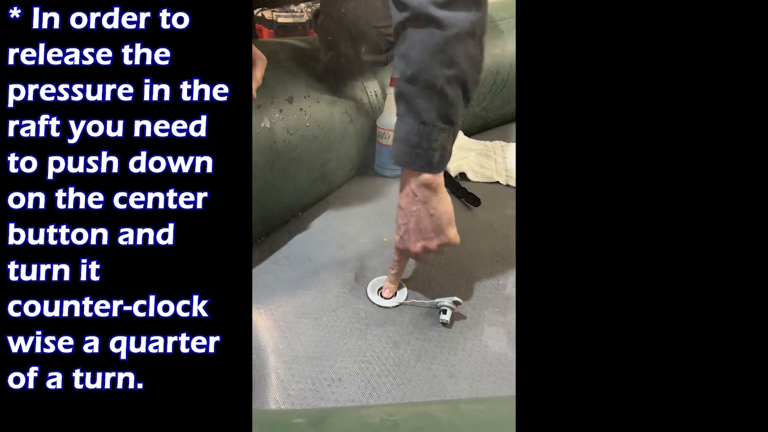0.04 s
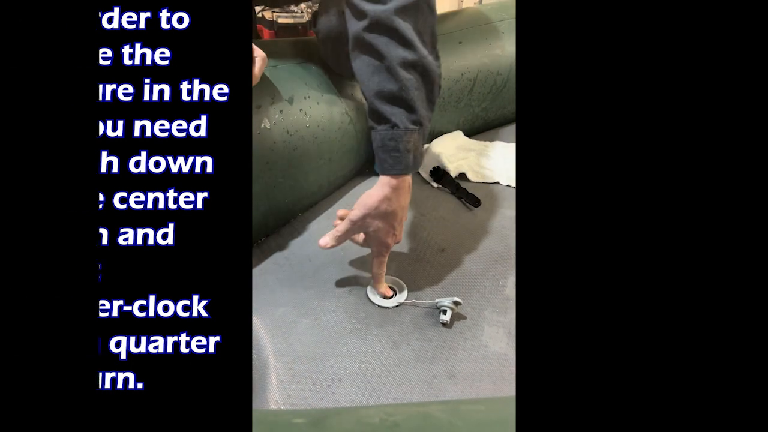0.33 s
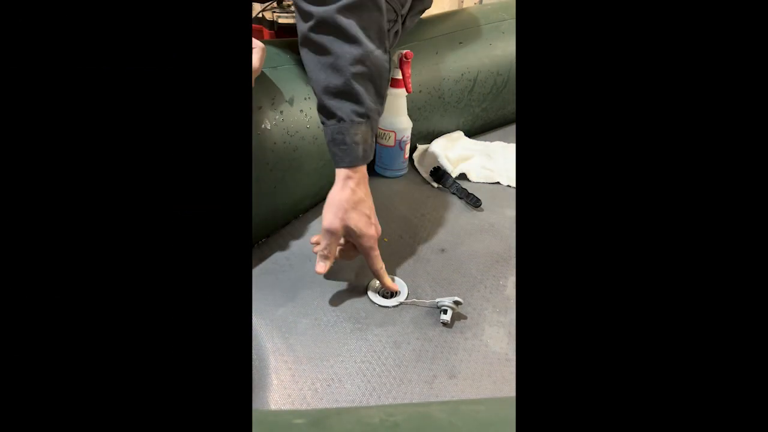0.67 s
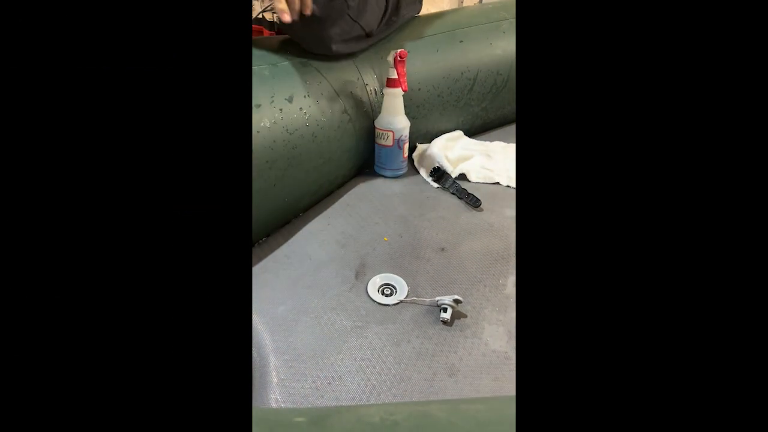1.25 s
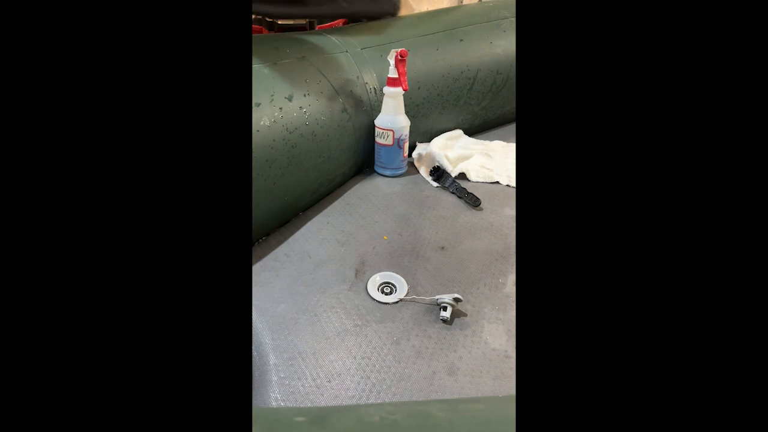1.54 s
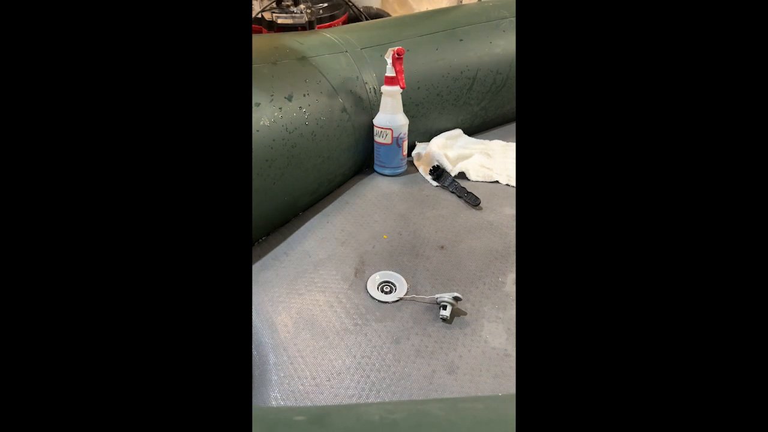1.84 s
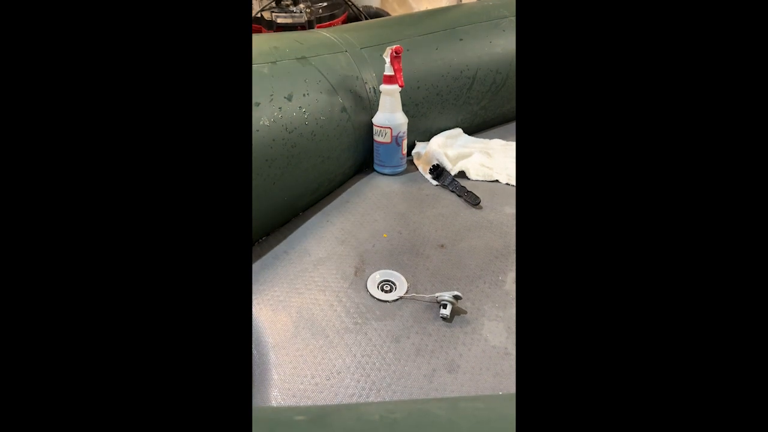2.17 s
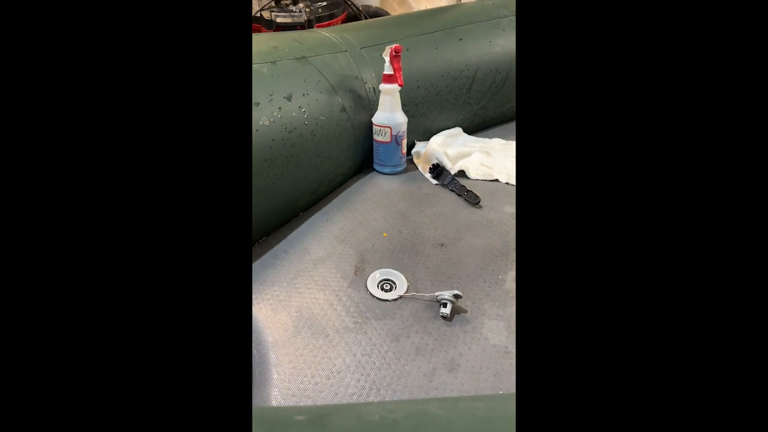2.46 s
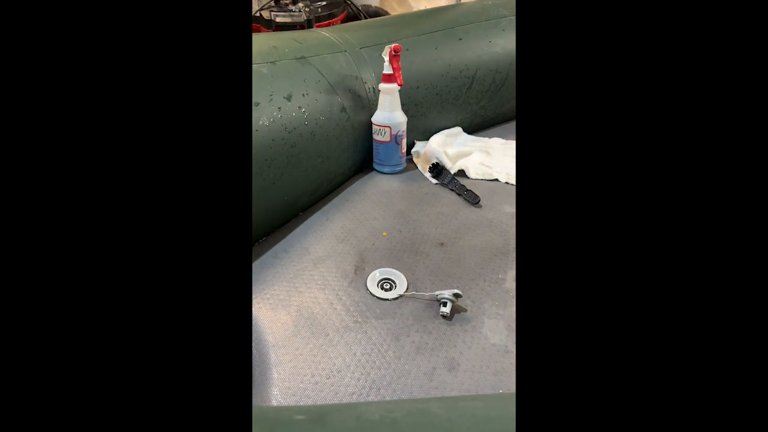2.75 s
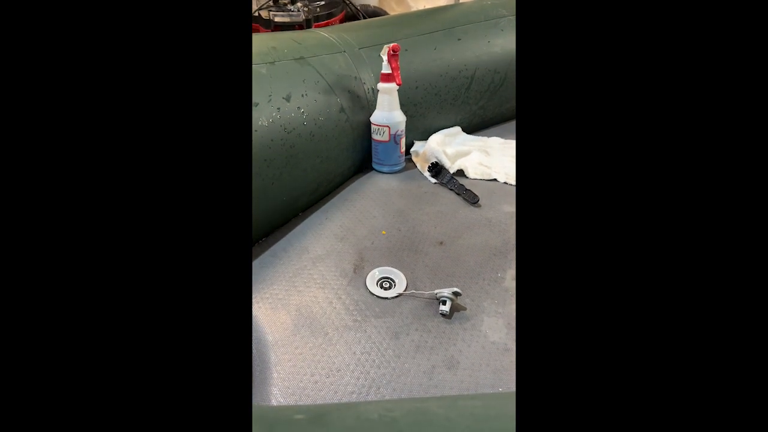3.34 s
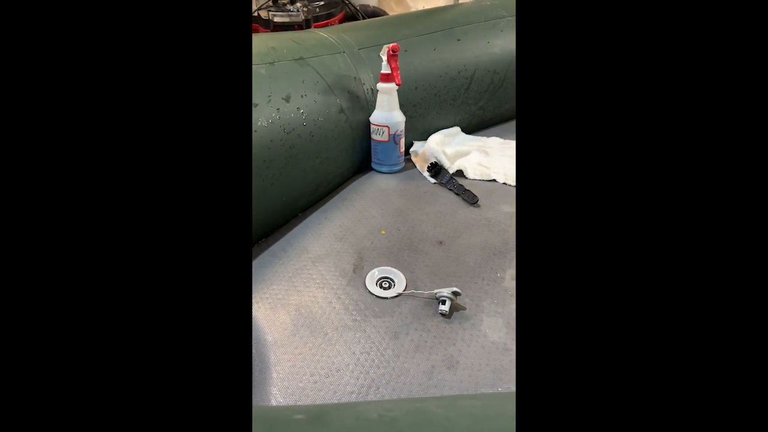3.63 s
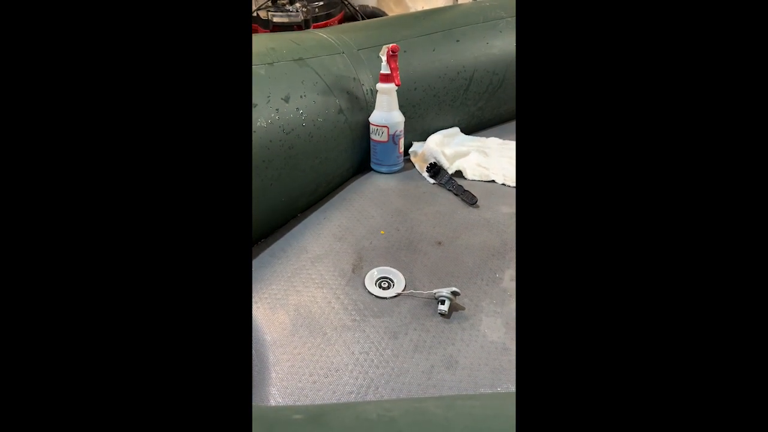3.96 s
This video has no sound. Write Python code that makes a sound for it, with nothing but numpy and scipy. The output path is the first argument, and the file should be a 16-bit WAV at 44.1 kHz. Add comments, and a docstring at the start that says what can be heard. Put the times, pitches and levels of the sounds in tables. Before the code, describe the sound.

A close jet of air rushes from the valve of a deflating raft. It wavers and buffets around a fingertip, then flows smoothly with a faint fuzzy whistle and dies down to a soft low rush.

```python
"""A jet of air rushes out of the valve of an inflatable raft, close by.
At first a finger turning the valve button deflects the jet into brief whistly hisses and a low buffeting.
Then the jet blows freely, with a fuzzy whistle at the valve seat, and weakens as the pressure falls:
the treble dies first, the low rush last. Each source is a map of loudness over pitch and time;
together the maps shape one stereo noise, which echoes faintly off the raft and the room."""
import sys
import numpy as np
from scipy import signal
from scipy.io import wavfile
from scipy.ndimage import uniform_filter1d

SR = 44100
rng = np.random.default_rng(int(sys.argv[2]) if len(sys.argv) > 2 else 0)


def dump_mix(stems):
    """Bounce the given channels to the path in sys.argv[1] as a 16-bit WAV at rate SR."""
    frames = np.atleast_2d(stems).T  # one column per channel
    limited = np.clip(frames, -1, 1)  # hard clip at full scale
    pcm = np.round(limited * 32767).astype(np.int16)
    wavfile.write(sys.argv[1], SR, pcm)


N = 176400
FRAME, HOP = 1024, 256  # samples in one slice of sound, and from one slice to the next
FINGER_OFF_S, HAND_EDGE_S = 0.97, 0.01  # when the finger leaves, and how fast the hand acts

# Strength of the jet as the raft empties: t/s, level/dB
FLOW = [(0, 1), (.45, 0.6), (.8, 1.4), (1, 1), (1.2, 0), (1.5, -1.1), (2, -4.5), (2.35, -6.5), (2.55, -8.5),
        (2.8, -9.5), (3.15, -14), (3.5, -16.5), (4, -22)]


def amp(db):
    """Turns decibels into a gain."""
    return 10 ** (np.asarray(db) / 20)


def unit_rms(x):
    """Scales a signal or a spectrum to an average power of one."""
    return x / np.sqrt(np.mean(x ** 2) + 1e-20)


def grid():
    """The axes of a map: times as a row, frequencies as a column."""
    return np.arange(N // HOP + 2)[None] * HOP / SR, np.fft.rfftfreq(FRAME, 1 / SR)[:, None]


def look_up(table, hz):
    """Reads a table's columns at any frequency, blending between rows on a log scale."""
    row_hz, *columns = np.transpose(table)
    return [np.interp(np.log(hz + 1), np.log(row_hz + 1), column) for column in columns]


def gate(t, start, end, edge):
    """One between start and end, zero outside, with soft edges."""
    return (np.tanh(2 * (t - start) / edge) - np.tanh(2 * (t - end) / edge)) / 2


def reflections(sound):
    """Weak echoes from the raft's tubes and the room give the tone a fine, steady ripple."""
    echo_db, fade_60db_s = -17.5, 0.15
    t = np.arange(SR // 8) / SR
    echoes = rng.standard_normal(t.size) * (rng.random(t.size) < .03)
    echoes *= amp(-60 * t / fade_60db_s) * (t > .003)
    response = amp(echo_db) * echoes / np.linalg.norm(echoes) + (t == 0)  # echoes plus direct sound
    return signal.fftconvolve(sound, response[None] / np.linalg.norm(response), axes=1)[:, :N]


def air_noise(gain_map):
    """Noise shaped by a map, slightly different left and right."""
    # Stereo image by pitch: f/Hz, left minus right/dB, likeness/0-1, left lead/rad
    stereo_image = [(150, 2, .99, -.03), (450, 2.6, .985, -.1), (680, 4.6, .97, -.36), (870, .7, .95, -.37),
                    (1100, 1.7, .97, -.18), (1310, 0, 1, 0), (2250, 0, 1, 0), (2600, -.8, .95, .45),
                    (2900, 0, .88, .5), (3170, 0, .35, 1.2), (3320, 8, .6, .05), (3720, 3.2, .95, -.1),
                    (3950, 4.3, .8, -.2), (4080, 2, .6, -.35), (4300, 0, 1, 0), (4600, .3, .98, 0),
                    (4850, 3, .84, -.35), (5200, 0, .84, -.85), (5800, .7, .88, -1.24),
                    (7000, .2, .89, -1.3), (9700, 0, .64, -1.3), (11500, 0, .82, -1.36),
                    (12700, 0, .62, -1.43), (14300, 0, .79, -1.56), (15700, 0, .62, -1.7)]
    t, hz = grid()
    white = rng.standard_normal((2, (t.size - 1) * HOP))
    left, unrelated = signal.stft(white, nperseg=FRAME, noverlap=FRAME - HOP)[2]
    balance_db, likeness, lead = look_up(stereo_image, hz)
    likeness = np.clip(likeness, 0, 1)
    right_gain = amp(-balance_db)
    blend = likeness * left + np.sqrt(1 - likeness ** 2) * unrelated
    right = blend * np.exp(-1j * lead) * right_gain
    pair = np.array([left, right]) * gain_map / np.sqrt((1 + right_gain ** 2) / 2)
    return signal.istft(pair, nperseg=FRAME, noverlap=FRAME - HOP)[1][:, :N]


def seat_whistle():
    """The valve seat whistles once the finger is off, fading quickly as the flow drops."""
    centre_hz, width_hz = 6120, 330
    t, hz = grid()
    flow_db = np.minimum(np.interp(t, *np.transpose(FLOW)), 0)
    ring = unit_rms(1 / (1 + (2 * (hz - centre_hz) / width_hz) ** 2))
    opened = (1 + np.tanh((t - FINGER_OFF_S) / HAND_EDGE_S)) / 2
    return amp(-24.5 + 2.8 * flow_db) * ring * opened


def finger_gap():
    """Deflected air rings in the gap at the fingertip, coming and going as the finger shifts."""
    # Short hisses and low buffets: start/s, end/s, centre/Hz, width/Hz, level/dB
    deflections = [(-.05, .33, 3950, 700, -25), (-.05, .45, 7500, 1400, -23.5),
                   (-.05, .46, 11900, 1700, -32), (-.05, 0.479, 2280, 1800, -25),
                   (-.05, .8, 4450, 1300, -28), (.085, 0.17, 2780, 600, -20.5), (.235, 0.3, 2880, 650, -21),
                   (.21, .44, 262, 109, -29), (.31, 0.4, 383, 130, -26.5), (.445, .515, 6400, 1530, -17.5),
                   (.5, 0.66, 2340, 1540, -19.5), (.52, 0.595, 6480, 2200, -17),
                   (.51, 0.55, 9600, 900, -33), (.637, .715, 5580, 900, -15),
                   (.655, 0.71, 6300, 1300, -15.5), (.712, 0.75, 2680, 497, -17.5),
                   (.712, 0.81, 1790, 1530, -19)]
    t, hz = grid()
    power = 0
    for start, end, centre, width, db in deflections:
        ring = unit_rms(1 / (1 + (2 * (hz - centre) / width) ** 4))
        power += (amp(db) * ring * gate(t, start, end, edge=0.0056)) ** 2
    return np.sqrt(power)


def turbulence(bands, slices):
    """Swirling air: a random map, smoothed over so many frequency bands and time slices."""
    t, hz = grid()
    swirl = rng.standard_normal((hz.size, t.size))
    for axis, span in [(0, bands), (1, slices)] * 2:
        swirl = uniform_filter1d(swirl, span, axis, mode="wrap")
    return unit_rms(swirl)


def air_jet():
    """The turbulent jet hisses, dulls as the flow drops, and is less steady with the finger in it."""
    # Tone of the jet, with the resonances of the valve body: f/Hz, level/dB
    colour = [(45, -20), (100, -18.5), (150, -10), (200, -2.5), (260, -2.1), (340, -4), (520, -2.5),
              (720, 1.3), (860, -5), (1130, -1), (1400, -4.5), (1600, -3.5), (1800, -1.5), (2080, -5.5),
              (2380, -1), (2560, 2.4), (2760, -0.4), (2950, -4), (3170, -8.5), (3380, -3), (3650, 0.6),
              (3880, -2), (4100, -13), (4300, -4.5), (4500, -4), (4800, -4.5), (5150, -1.5), (5330, -4),
              (5500, -1), (6250, -0.5), (6650, -3), (7100, -1), (7400, -6.5), (7900, -6), (8200, -8.5),
              (8800, -6.5), (9600, -12.5), (10700, -10.5), (11150, -12), (11600, -9), (12750, -14),
              (13100, -13), (14500, -11), (15300, -12.5), (15700, -19)]
    # How each pitch follows the flow: f/Hz, slope/(dB per dB of flow), flow where it levels off/dB
    follow = [(100, -0.2, 2.5), (244, 0.63, -5), (450, 0.87, -2), (780, 0.97, 0), (1400, 1, -2.5),
              (3700, 0.94, 3), (4500, 0.94, 3), (5700, 1.47, 3), (7900, 1.39, 3), (15000, 1.37, 1)]
    # The hand gets in the jet's way: start/s, end/s, treble change/dB, low rush change/dB
    covers = [(-.05, .46, 0.3, -2.5), (0.458, 0.53, -0.5, -3.8), (.515, 0.61, -.3, -1),
              (.585, .648, -1, -3), (0.646, .712, -4, -8), (.712, 0.824, -1.5, -2.5), (.82, 1, 0, -2)]
    jet_db, rush_top_hz = -13, 940
    t, hz = grid()
    flow_db = np.interp(t, *np.transpose(FLOW))
    slope, full_db = look_up(follow, hz)
    level_db = jet_db + slope * (np.minimum(flow_db, full_db) - np.minimum(full_db, 0))
    low_share = 1 / (1 + (hz / rush_top_hz) ** 4)
    for start, end, treble_db, low_db in covers:
        shade_db = (1 - low_share) * treble_db + low_share * low_db
        level_db += shade_db * gate(t, start, end, HAND_EDGE_S)
    eddies_db = np.where(t < FINGER_OFF_S, 1, 0.86) * turbulence(bands=12, slices=12)
    flutter_db = -0.05 * unit_rms(turbulence(bands=1, slices=8)[0])  # all pitches waver together
    tone = unit_rms(amp(look_up(colour, hz)[0]))
    return amp(level_db + eddies_db + flutter_db) * tone


def scene():
    """Whistle, deflected air and jet come from one spot, so their powers add into one noise."""
    power = seat_whistle() ** 2 + finger_gap() ** 2 + air_jet() ** 2
    return reflections(air_noise(np.sqrt(power)))


def record(dry):
    """The bass is thinned and the highest treble is cut off."""
    low_cut_hz, high_cut_hz = 230, 15850
    thin = signal.sosfilt(signal.butter(2, low_cut_hz, "high", fs=SR, output="sos"), dry)
    treble_cut = signal.firwin(611, high_cut_hz, window=("kaiser", 11), fs=SR)
    return signal.oaconvolve(thin, treble_cut[None], "same")


dry = scene()
out = record(dry)
dump_mix(out)
```